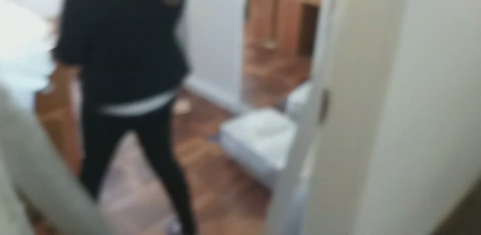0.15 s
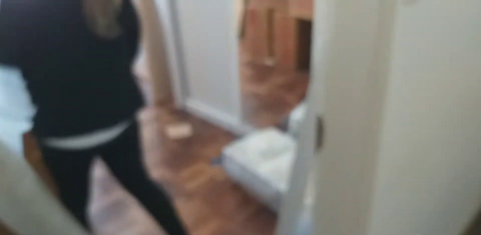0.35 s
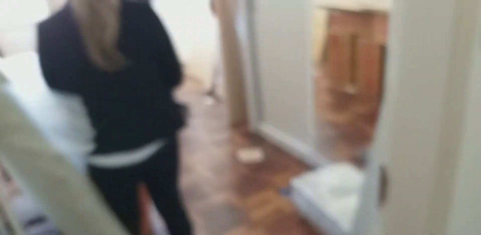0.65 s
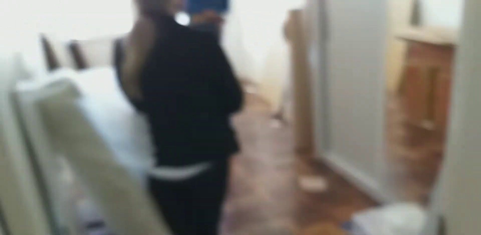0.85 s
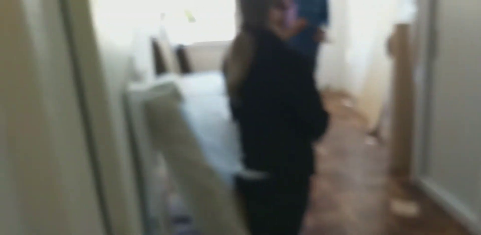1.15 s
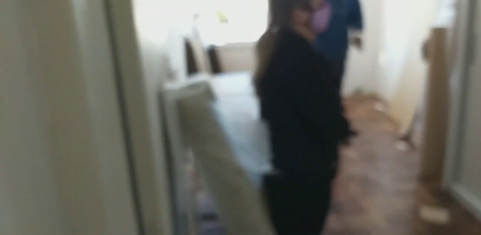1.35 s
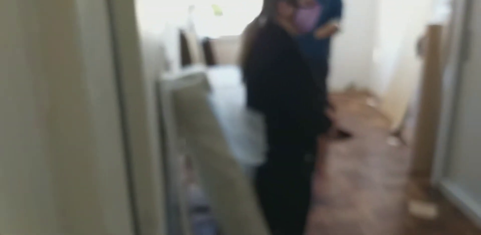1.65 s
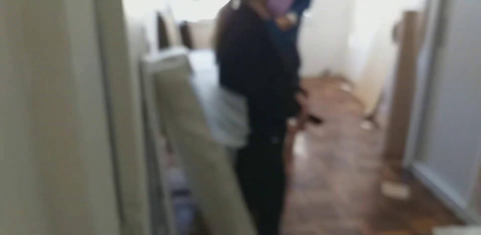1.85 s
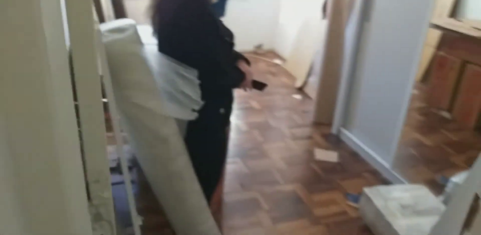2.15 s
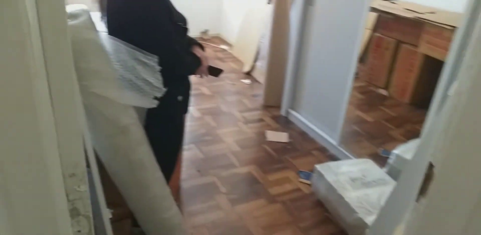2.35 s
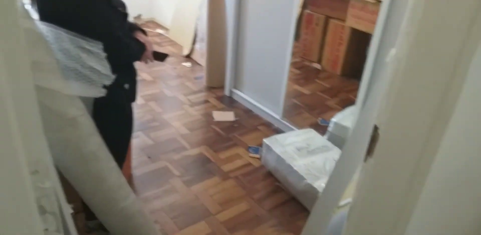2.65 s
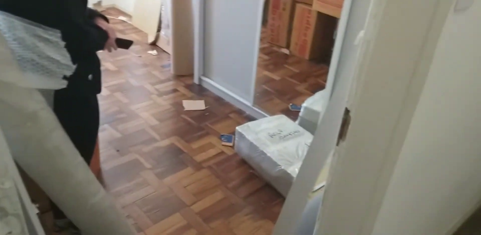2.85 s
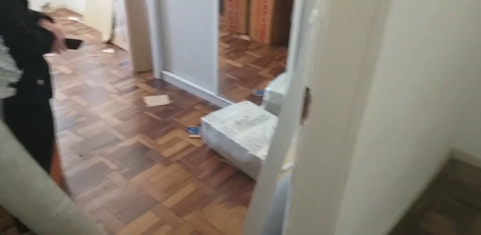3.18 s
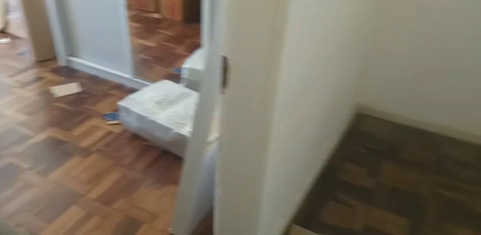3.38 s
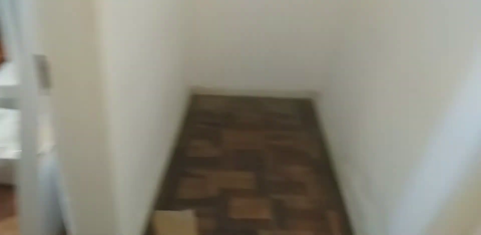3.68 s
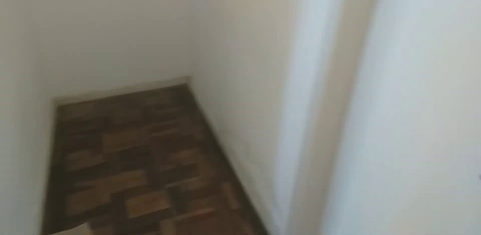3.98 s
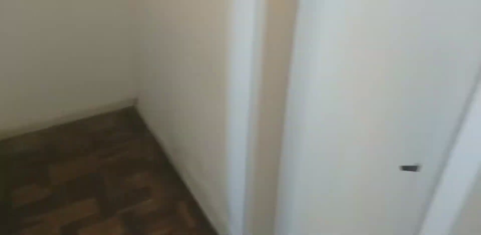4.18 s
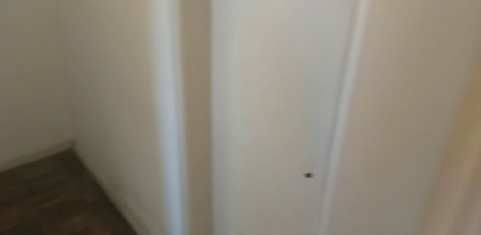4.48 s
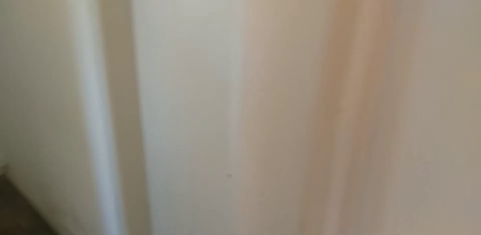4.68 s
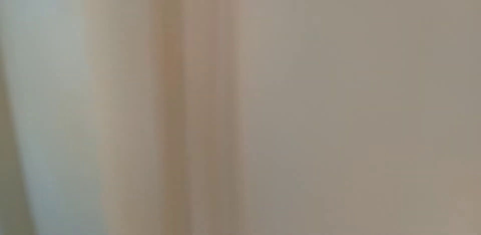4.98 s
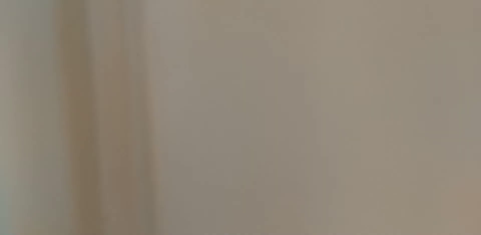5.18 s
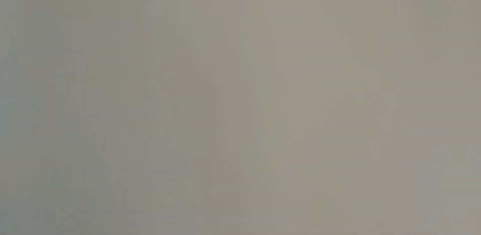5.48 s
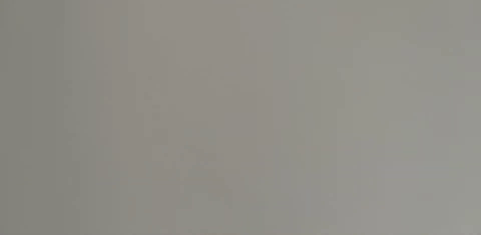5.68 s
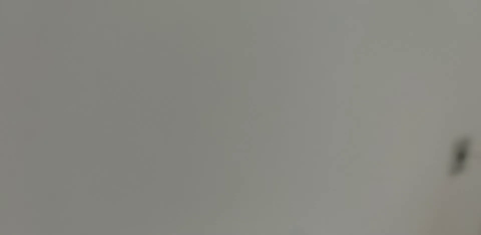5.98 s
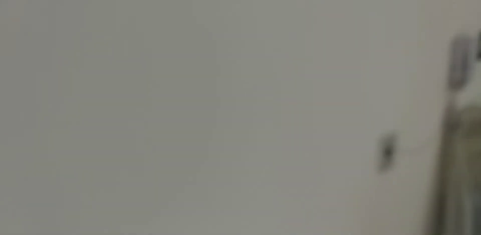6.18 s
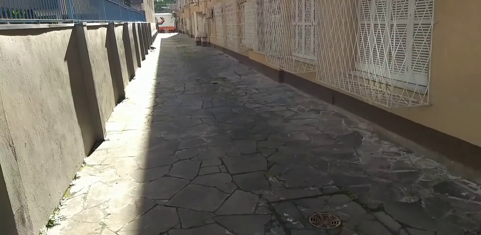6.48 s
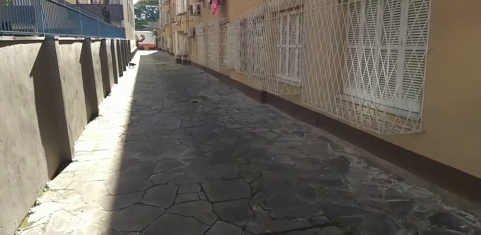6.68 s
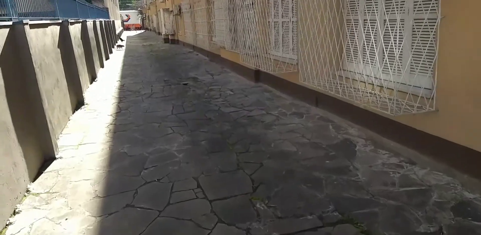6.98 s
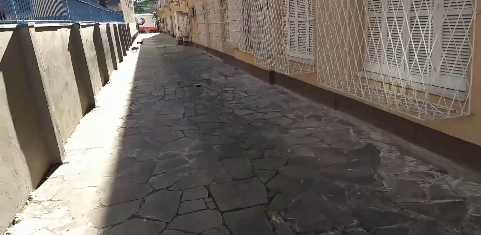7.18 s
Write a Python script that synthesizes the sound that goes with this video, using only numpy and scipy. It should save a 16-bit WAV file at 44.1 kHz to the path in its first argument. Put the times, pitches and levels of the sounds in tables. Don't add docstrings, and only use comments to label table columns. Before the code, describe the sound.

Soft soles scuff and step on a bare wooden floor in a ringing empty room, then an airy alley with insect chirps.

```python
import sys
import numpy as np
from scipy import signal
from scipy.fft import rfft, irfft, next_fast_len
from scipy.io import wavfile
from scipy.ndimage import uniform_filter1d, map_coordinates

SR = 44100
rng = np.random.default_rng(int(sys.argv[2]) if len(sys.argv) > 2 else 0)


def store_wav(level_fs):
    pcm = np.round(np.clip(np.atleast_2d(level_fs), -1, 1) * 32767)
    wavfile.write(sys.argv[1], SR, pcm.T.astype(np.int16))


def gain_from_decibels(decibels):
    exponent = np.asarray(decibels, float) / 20
    return 10 ** exponent


N = 323694

# (time [s], peak level [dB], wood above it [dB], grit above it [dB])
LANDINGS = [(0.2726, -31, -13, -1), (0.371, -31, -19, -9), (0.5803, -37, -25, -16), (0.7433, -9, -30, 7),
            (1.086, -14, -12.5, -3), (1.4534, -40, -38, -2), (1.6392, -25, -31, -4), (1.724, -40, -24, -18),
            (1.916, -18.5, -48, 5.5), (2.3513, -24, -1.5, -0.5), (2.732, -37, -28, 2),
            (2.7636, -23, -14, -14.5), (2.805, -19, -7, -14), (2.9873, -15.5, -14.5, -14),
            (3.296, -40.5, -11, 9), (4.5042, -66, -37, -22), (4.894, -43, -21, -12), (5.224, -13, -38, -32),
            (5.801, -30, -25, -17), (6.1544, -32, -35, -6), (6.252, -14.5, -21, -18)]
# (time [s], peak level [dB], pitch [Hz], life
KNOCKS = [ (.2686, -30, 4500, 1.5), (.5833, -29, 7000, 1), (.5916, -24, 7500, 1), (.7453, -8, 8900, 2.6),
          (.7483, -16, 4600, 1.5), (.7763, -15, 4800, 1.5), (.7806, -15, 4200, 1.5), (1.1016, -22, 8000, 1),
          (2.8068, -18.5, 5500, 1), (2.75, -53, 170, 1.5), (2.806, -43, 300, 2), (2.826, -43, 190, 2),
          (2.851, -43, 325, 4.5), (2.84, -46, 250, 4), (2.736, -56, 220, 2), (2.866, -46, 200, 2),
          (3.062, -50, 380, 3), (.848, -46, 430, 6), (.868, -59, 300, 4), (.89, -54, 440, 6),
          (4.905, -45, 1150, 4), (4.922, -44, 1100, 5), (2.9, -50, 190, 2), (2.996, -44, 280, 2),
          (3.017, -42, 300, .8), (3.028, -40, 170, .6), (3.039, -42, 220, .6), (3.039, -45, 88, 3),
          (3.053, -42, 190, .8), (3.1, -48, 210, 2), (4.9232, -32, 7800, 1.5), (5.2236, -33, 2600, 1.6),
          (5.2243, -33, 5000, 3), (5.2252, -35, 3700, 2), (5.2262, -32, 5000, 2.5),
          (5.2268, -35, 2500, 1.6), (5.5815, -36, 7000, 1), (5.7318, -21, 1500, .7),
          (5.7319, -31, 3600, .9), (5.7338, -40, 550, .7), (5.7418, -42, 1300, 1.5),
          (5.748, -41, 1700, 1.5), (5.738, -40, 1580, 2), (5.7451, -40, 1370, 1.5), (5.7502, -32, 1300, .8),
          (5.7503, -41, 4800, 1.5), (5.7535, -42, 1500, 1.5), (5.8518, -25, 5500, 1),
          (5.85235, -19, 11500, .9), (5.85315, -16, 3000, .85), (5.85315, -22, 6200, 1.6),
          (5.85315, -18.5, 11800, 1.5), (5.853, -26, 14500, 2)]
# (time [s], peak level [dB], pitch [Hz], life [cycles])
SAND = [(1.7302, -37, 8400, 2), (2.3556, -29, 13000, 2), (2.7327, -34, 8000, 1.5), (2.7372, -33, 9400, 2),
        (2.7818, -30, 9200, 2), (2.9905, -31, 8400, 1.5), (3.2958, -38, 11300, 1.5), (3.2997, -39, 8100, 2),
        (4.1693, -38, 7500, 2), (4.5057, -42, 7800, 3), (4.5065, -49, 5500, 6), (4.511, -51, 5700, 8),
        (4.5165, -49, 5600, 8), (4.523, -49, 5700, 5), (4.527, -48, 5700, 9), (4.5345, -49, 5500, 4),
        (4.55, -51, 5500, 4), (4.5548, -48, 5300, 4), (2.3532, -36, 3600, 3), (2.3618, -32, 9000, 2),
        (2.3873, -33, 4200, 3), (2.9888, -33, 4500, 2), (5.1928, -37, 11900, 2), (5.4075, -39, 11600, 2),
        (5.8017, -38, 7900, 3), (5.9309, -30, 7300, 1), (5.9412, -34, 8300, 1.2), (5.9497, -32, 9000, 1),
        (5.9915, -35, 11500, 1), (6.004, -34, 12000, .8), (6.025, -36, 5500, 1.5), (6.037, -36, 5500, 1.5),
        (6.1545, -39, 12500, 1), (6.1555, -37, 8400, 2), (6.1629, -38, 13700, 2), (6.1672, -36, 8600, 2),
        (6.1676, -41, 14000, 2), (6.2542, -36, 8100, 1.5), (6.2535, -36, 4500, 1.5),
        (6.3517, -41, 13400, 2)]
# (frequency [Hz], density [dB])
SOLE_SPECTRUM = [(240, -34), (400, -21), (432, -8.5), (527, -12), (684, -6.5), (1050, -9), (1640, -10.5),
                 (1800, -8), (2850, -8), (3500, -7.5), (4350, -6), (5300, -7.5), (6410, -9), (7830, 0.5),
                 (12400, 5.5), (15600, -11.5)]
# (frequency [Hz], density [dB])
BOARD_SPECTRUM = [(71, -36), (120, -6), (156, -2), (326, 0), (417, -1), (800, 1), (1760, -120)]
# (frequency [Hz], density [dB])
HUSH_SPECTRUM = [(18, -33), (30, -2), (85, 1.5), (144, -1.5), (422, -4), (1300, -8), (1520, -7),
                 (2310, -13), (3000, -12), (4220, 2), (6580, -3), (8330, 4), (12300, -4.5), (15600, -11.5)]
# (time [s], firing tone level [dB], load as its octave above it [dB])
ENGINE = [(0.0, -87, -18), (.8, -73, -13), (1.05, -63, -28), (1.5, -72, -6), (2.05, -64, -2),
          (2.35, -83, -1), (2.9, -86, 1), (3.1, -63, -9.5), (4.2, -61.5, -4.5), (4.5, -57, 0),
          (5.05, -57, -8.5), (5.2, -60, -24), (5.4, -58, -12), (5.75, -59, -20), (6.44, -56.5, -23)]
# (frequency [Hz], decay time t60 [s])
ROOM_T60 = [(300, 0.081), (1500, 1), (5000, 0.48), (12000, 0.28)]
# (frequency [Hz], width [Hz], level [dB])
ROOM_MODES = [(80, 20, -73), (145, 14, -73.5)]
# (frequency [Hz], density [dB])
TOWN_SPECTRUM = [(18, -46), (30, -14), (103, -1.5), (233, -4.5), (374, -10.5), (801, -11.5), (1810, -7.5),
                 (3310, -24), (4420, -20), (5310, -21.5), (5740, -22), (6210, -26), (10500, -23.5),
                 (14000, -26), (16000, -37)]
# (time [s], peak level [dB], pitch [Hz], life [cycles])
ALLEY_TICKS = [(6.4832, -51, 14300, 2), (6.4949, -44, 11000, 1), (6.538, -45, 14500, 3),
               (6.5403, -38, 14300, 3), (6.5435, -44, 14500, 3), (6.6035, -42, 13500, 3),
               (6.6214, -43, 7700, 2), (6.6261, -41, 12600, 3), (6.6293, -44, 7900, 2),
               (6.6674, -38, 12850, 3), (6.8244, -52, 14300, 30), (6.8215, -52, 13500, 2),
               (7.0856, -45, 10500, 1.5), (7.1088, -36, 8700, 1.5), (7.1086, -40, 13000, 1.5),
               (7.1093, -44, 5050, 14), (7.111, -48, 5850, 8), (7.1467, -37, 7700, 2),
               (7.1469, -39, 12500, 1.5)]
# (time [s], peak level [dB], pitch [Hz], life [cycles])
STONE_STEP = [(7.107, -36.5, 402, 6.4), (7.12, -41, 517, 4), (7.144, -46, 805, 4), (7.175, -41, 135.1, 4),
              (7.31, -46, 450, 8), (6.857, -41, 95, 2), (6.91, -46.5, 800, 27)]
# (time [s], level [dB], run-up [s], hold [s])
SWISHES = [
    (6.48, -70, 0.022, .03),
    (6.542, -64, .015, 0.046),
    (6.64, -63, 0.096, .01),
    (7.109, -54, 0.046, .01),
    (7.175, -72, 0.066, 0.0092),
    (7.32, -71, .1, .02),
]
# (time [s], length [s], level [dB])
CHIRPS = [(6.492, .036, -66), (6.54, .035, -68), (6.59, 0.021, -71), (6.616, .028, -64), (6.655, .022, -65),
          (6.684, .022, -65), (6.725, .022, -72), (6.768, .054, -67), (6.83, 0.027, -61),
          (6.863, 0.026, -61), (6.912, .034, -66), (6.958, 0.069, -63), (7.045, .022, -69),
          (7.084, 0.033, -64), (7.135, .036, -68), (7.18, 0.039, -64), (7.245, .02, -69),
          (7.277, .018, -66), (7.3, .024, -64), (7.33, .03, -65.5)]
# (frequency [Hz], width [Hz], level [dB], phase [rad])
PORTS = [(1933, 440, -11.5, 0.56), (9620, 780, -11, 2.1)]
# (time [s], rasp level [dB], slide [s], grit above it [dB], dust above it [dB])
GRIPS = [(0.272, -43.5, 0.0074, -8.5, -9), (.588, -45, 0.015, 1.5, -9.5), (0.746, -25, 0.032, -2.5, -3.5),
         (1.101, -41.5, 0.01, -1, 2), (1.087, -50, .01, 9.5, 0), (.372, -52.5, .01, -2, -2),
         (1.278, -47, 0.025, -2.5, -1.5), (1.918, -51, 0.0063, 1, 10), (1.465, -47, 0.081, 0, -5),
         (2.353, -46, 0.061, 0, 0), (2.734, -50.5, 0.038, 3.5, 3.5), (2.993, -46, 0.045, -4, -3),
         (3.1, -58.5, 0.11, 3, -6), (4.508, -65, 0.0078, 5, 4), (5.23, -50, 0.011, -12, -3),
         (5.805, -53, .01, 3, -8), (5.822, -47, 0.016, 4, -7), (5.841, -52, 0.0081, 7.5, -5),
         (5.87, -52, .25, 2.5, -9), (6.155, -58, .015, -0.5, -4), (6.251, -50, 0.075, -5, -11),
         (6.254, -50, .008, -3, -12)]
# (time of full speed [s], rasp level [dB], run-up [s], slide [s], brightness [dB])
DRAGS = [(0.0, -50, .1, 0.12, -1.5), (0.449, -46.5, 0.096, 0.0033, -2), (.71, -54, 0.022, .03, 3.5),
         (1.22, -48.5, 0.16, 0.012, 2.5), (1.651, -55, 0.1, 0.039, -9), (1.96, -47.5, 0.4, .25, 4),
         (1.44, -54, 0.046, .01, 0), (2.3, -55, 0.046, 0.027, 3.5), (2.77, -42, 0.012, 0.008, 0.5),
         (2.808, -41.5, 0.01, 0.0069, 3), (3.37, -56.5, 0.15, 0.025, -0.5), (3.56, -53, 0.18, 0.095, 3),
         (3.78, -50.5, 0.15, 0.068, 2), (4.05, -72, 0.034, 0.039, 6.5), (4.17, -57.5, 0.084, 0.14, 5.5),
         (4.33, -56.5, 0.25, 0.025, 3.5), (4.66, -62.5, 0.14, 0.004, 5.5), (4.78, -52.5, 0.093, 0.018, 4.5),
         (4.915, -46, 0.07, 0.011, 1.5), (4.985, -54, .03, 0.027, -4.5), (5.2, -56, 0.11, .005, 4),
         (5.42, -58.5, 0.13, 0.02, 5), (5.505, -54.5, 0.11, .005, 2), (5.575, -54, 0.063, 0.12, 3.5),
         (5.77, -63, 0.14, 0.013, -17)]
# (time [s], level
# [dB], height above the joists [octaves], run-up [s], hold [s])
FLOOR_LOADS = [(0.83, -50, 1.16, 0.071, 0.027), (2.34, -56, -1, 0.07, 0.056), (2.815, -44, 0.4, 0.017, 0.029),
               (2.994, -46.5, 0.2, 0.015, 0.038), (3.008, -48, -0.9, 0.029, 0.13),
               (3.365, -60.5, 0.7, 0.08, 0.086), (3.516, -60, 1.2, 0.033, 0.065), (3.596, -67, 2, .05, .04),
               (0.03, -66, -0.8, .05, 0.29), (2.203, -69, 0, .06, .03), (2.764, -47.5, -0.5, 0.016, 0.075),
               (4.305, -61.5, 0.6, 0.072, 0.043), (5.236, -57, 1.4, 0.061, 0.05),
               (5.418, -56.5, 0.3, 0.055, 0.067), (5.44, -67, -1.6, .05, .08), (6.3, -59.5, .5, .08, 0.036),
               (3.55, -61.5, -.5, .2, .1), (.575, -63, 2, .012, .005), (5.391, -52.5, 1.43, 0.032, 0.06),
               (5.728, -57.5, 1, 0.013, 0.0049), (5.747, -48, 4, 0.036, .005), (6.3, -59.5, 2.2, 0.072, 0.014),
               (0.115, -56, 2.41, 0.12, 0.026), (0.458, -53.5, 2.28, 0.12, 0.0045),
        (0.593, -46, 2.37, 0.012, .005), (0.757, -31, 2.75, 0.013, 0.018),
        (1.104, -48, 2.24, 0.0066, 0.021), (1.19, -61, 1.6, .05, 0.034), (1.563, -53, 3.05, 0.05, 0.03),
        (2.063, -56, 2.5, 0.19, 0.36), (2.37, -50.5, 1.44, 0.12, 0.027), (2.804, -48.5, 1.95, 0.033, 0.025),
        (3.013, -51.5, 2.34, 0.046, 0.032), (3.793, -60, 2.35, 0.13, 0.015),
        (4.266, -60, 2.24, 0.08, 0.078), (4.37, -59, 1.7, 0.043, 0.025), (4.793, -63, 1.6, 0.037, .005),
        (4.904, -51.5, 2.24, 0.015, 0.024), (5.224, -49, 3.08, 0.015, 0.039),
        (5.839, -45, 2.5, 0.023, 0.011), (1.786, -58.5, 2.95, .1, 0.14), (1.29, -51.5, 3.37, .03, .06),
        (1.645, -56.5, 2.77, .015, 0.041), (.44, -55, 3.4, .05, 0.043), (2.356, -52, 3.6, .02, 0.066),
        (.9, -51, 3.6, .04, .04), (3.645, -56.5, 2.93, 0.26, 0.13), (5.007, -57, 2.87, 0.15, 0.022),
        (5.64, -65, 1.5, 0.2, 0.028), (6.266, -55, 3.45, .01, 0.22), (5.919, -53, 2.54, 0.034, .12)]

SILENCE_FROM_S, SILENCE_TO_S = 6.439, 6.478
HUSH_DB, JOIST_DB, RUMBLE_DB = -55, -79, -70.5
FIRING_HZ = 55
RUN_UP_DB, GRIP_S, CONTACT_S = 13.5, 0.0089, 0.0088
SLIDE_DB_S = 19.5
GRIP_FADE_DB_S, DRAG_FADE_DB_S, DUST_FADE_DB_S, WOOD_FADE_DB_S, SWISH_FADE_DB_S = 149, 122, 27, 136, 81
DUST_FOLLOWS, DUST_DB = 0.78, -2.5
SLAT_DB, SLAT_BRIGHT = -11.5, 0.29
WOOD_UP_DB_OCT, WOOD_DOWN_DB_OCT = 14, 16
WALLS_DB, WALLS_STRETCH = -14, .2
OFF_CENTRE_DB = -14
TOP_HZ = 15830


def unit(x):
    return x / np.sqrt(np.mean(x ** 2) + 1e-20)


def along(points, hz):
    f, v = np.transpose(points)
    return np.interp(np.log(hz + 1), np.log(f + 1), v)


def curves(rows):
    s, *cols = np.transpose(rows)
    return [np.interp(np.arange(N) / SR, s, c) for c in cols]


def wobble(rate):
    knots = rng.standard_normal(int(N * rate / SR) + 4)
    return map_coordinates(knots, [np.arange(N) * rate / SR])


def filtered(x, response):
    m = next_fast_len(len(x) + 8192)
    return irfft(rfft(x, m) * response(np.fft.rfftfreq(m, 1 / SR)), m)[:len(x)]


def band(x, spectrum, lo_hz, hi_hz):
    def response(hz):
        low_edge = 1 + (lo_hz / (hz + 1)) ** 16
        high_edge = 1 + (hz / hi_hz) ** 16
        return gain_from_decibels(along(spectrum, hz)) / np.sqrt(low_edge * high_edge)
    return unit(filtered(x, response))


def narrow(hz, width_hz, db):
    noise = rng.standard_normal(N)
    return gain_from_decibels(db) * unit(filtered(noise, lambda f: np.exp(-((f - hz) / width_hz) ** 2)))


def patchy(depth_db, grain_db):
    z = signal.stft(rng.standard_normal(N + 512), nperseg=512)[2]
    field = rng.standard_normal(z.shape)
    field = uniform_filter1d(uniform_filter1d(field, 8, 0), 8, 1)
    x = signal.istft(z * gain_from_decibels(depth_db * unit(field)), nperseg=512)[1][:N]
    return x * gain_from_decibels(grain_db * wobble(500))


def tail(stretch):
    hz, t, z = signal.stft(rng.standard_normal(SR // 2), SR, nperseg=256)
    loss_db = 60 * t / (stretch * along(ROOM_T60, hz)[:, None])
    x = signal.istft(z * gain_from_decibels(-loss_db), SR, nperseg=256)[1]
    return x / np.linalg.norm(x)


def pings(rows, gain_db):
    out = np.zeros(N + SR)
    t = np.arange(-SR // 100, SR // 20) / SR
    for s, db, hz, cycles in rows:
        rise = np.where(t < 0, 2, 1)
        life = np.exp(-(t * hz / max(cycles, .3)) ** 2 * rise)
        swing = np.cos(2 * np.pi * hz * t) * life
        balanced = swing - life * swing.sum() / life.sum()
        out[round(s * SR) - SR // 100:][:len(t)] += gain_from_decibels(db + gain_db) * balanced
    return out[:N]


def strokes(s, db, run_up, hold, fade_db_s):
    clock = np.arange(0, N / SR + .002, .002)
    t = clock - s[:, None]
    hold = np.abs(hold)[:, None]
    loss = RUN_UP_DB * np.maximum(-t, 0) / np.maximum(run_up, .003)[:, None]
    loss = loss + SLIDE_DB_S * np.clip(t, 0, hold)
    loss = loss + fade_db_s * np.maximum(t - hold, 0)
    power = (gain_from_decibels(db[:, None] - loss) ** 2).sum(axis=0)
    return np.interp(np.arange(N) / SR, clock, np.sqrt(power))


def load(octave):
    s, db, centre, run_up, hold = np.transpose(FLOOR_LOADS)
    slope = np.where(octave > centre, WOOD_UP_DB_OCT, WOOD_DOWN_DB_OCT)
    return strokes(s, db - slope * np.abs(octave - centre), run_up, hold, WOOD_FADE_DB_S)


def hush():
    return gain_from_decibels(HUSH_DB - 2.0) * band(rng.standard_normal(N), HUSH_SPECTRUM, 39, 17000)


def drone():
    return sum(narrow(*mode) * gain_from_decibels(2.1 * wobble(3.58)) for mode in ROOM_MODES)


def engine():
    first_db, effort_db = curves(ENGINE)
    rumble = np.hypot(gain_from_decibels(RUMBLE_DB + 4.1 * wobble(5.2)), load(-0.89))
    turn = 2 * np.pi * np.cumsum(FIRING_HZ * (1 + 0.0258 * wobble(15))) / SR
    firing = gain_from_decibels(first_db - 5.0 + 1.5 * wobble(7.4)) * np.sin(turn)
    octave = gain_from_decibels(first_db + effort_db + 0.86 * wobble(3.6)) * np.sin(2 * turn)
    return firing + octave + gain_from_decibels(-4.0) * rumble * band(rng.standard_normal(N), HUSH_SPECTRUM, 76, 184)


def insect():
    hz, wander, wander_hz, edge_s, between_db = 5570, .0015, 40, .005, -74
    s, length, db = np.transpose(CHIRPS)
    clock = np.arange(SILENCE_TO_S, N / SR, edge_s / 2)
    t = clock - s[:, None]
    chirp = np.tanh(t / edge_s) - np.tanh((t - length[:, None]) / edge_s)
    gate = (gain_from_decibels(db[:, None]) * chirp).sum(axis=0) + gain_from_decibels(between_db)
    turn = 2 * np.pi * np.cumsum(hz * (1 + wander * wobble(wander_hz))) / SR
    return np.interp(np.arange(N) / SR, clock, gate) * gain_from_decibels(wobble(27)) * np.sin(turn)


def alley():
    cloth = strokes(*np.transpose(SWISHES), SWISH_FADE_DB_S)
    rumble = np.hypot(gain_from_decibels(-56.5), gain_from_decibels(2.5) * cloth)
    town = np.hypot(gain_from_decibels(-53.5), gain_from_decibels(1) * cloth)
    hiss = np.hypot(gain_from_decibels(-59), gain_from_decibels(-0.5) * cloth)
    air = patchy(depth_db=1.3, grain_db=1.2)
    far = rumble * band(air, TOWN_SPECTRUM, 51, 790)
    far += town * band(air, TOWN_SPECTRUM, 700, 4040)
    far += hiss * band(air, TOWN_SPECTRUM, 3380, 9060)
    far += narrow(15100, 600, -78)
    near = cloth * band(patchy(depth_db=1.2, grain_db=2), TOWN_SPECTRUM, 9000, 16000)
    return far + near + insect() + pings(ALLEY_TICKS, gain_db=0) + pings(STONE_STEP, gain_db=-9)


def knocks():
    x = pings(KNOCKS + SAND, gain_db=0)
    return x + gain_from_decibels(-14.5) * signal.fftconvolve(x, tail(0.086))[:N]


def squeak():
    start, end = 5.8057, 5.8358
    first_hz, last_hz, first_db, last_db = 700, 930, -34, -28
    share = np.linspace(0, 1, 400)
    slips = np.cumsum(first_hz + (last_hz - first_hz) * share) * (end - start) / len(share)
    at = np.interp(np.arange(int(slips[-1])), slips, share)
    rows = []
    for u in at:
        a, b = rng.standard_normal(2)
        db = first_db + u * (last_db - first_db) + 1.5 * a
        rows.append((start + u * (end - start), db, 7920 * (1 + 0.02 * b), 2.2))
    return pings(rows, gain_db=0)


def steps():
    out = np.zeros(N + 2 * SR)
    t = np.arange(SR // 4) / SR
    for s, db, wood_db, grit_db in LANDINGS:
        grain_gain = np.repeat(rng.standard_normal(len(t) // 25), 25)
        grains = rng.standard_normal(len(t)) * gain_from_decibels(7 * grain_gain)
        colour = band(grains, SOLE_SPECTRUM, 1660, 6540)
        colour += gain_from_decibels(grit_db + 11.5) * band(grains, SOLE_SPECTRUM, 7100, 17000)
        colour += gain_from_decibels(wood_db + 4.5) * band(grains, SOLE_SPECTRUM, 500, 3100)
        burst = gain_from_decibels(db - 31.0) * colour * (1 - np.exp(-t / 0.0009)) * np.exp(-t / CONTACT_S)
        wet = gain_from_decibels(4.5) * signal.fftconvolve(burst, tail(1.0))
        start = round((s - .003) * SR)
        out[start:][:len(t)] += burst
        out[start + 130:][:len(wet)] += wet
    return out[:N]


def scuffs():
    strokes_made = [(s, db, GRIP_S, slide, grit, dust, GRIP_FADE_DB_S) for s, db, slide, grit, dust in GRIPS]
    for *row, bright in DRAGS:
        strokes_made.append((*row, bright, DUST_DB + DUST_FOLLOWS * bright, DRAG_FADE_DB_S))
    s, db, run_up, slide, grit_db, dust_db, fade = np.transpose(strokes_made)
    fade = fade[:, None]
    rasp = strokes(s, db, run_up, slide, fade)
    grit = strokes(s, db + grit_db, run_up, slide, fade)
    dust = strokes(s, db + dust_db, run_up, slide, fade + DUST_FADE_DB_S)
    rubbed = strokes(s, db + SLAT_DB + SLAT_BRIGHT * grit_db, run_up, slide, fade)

    joist = np.hypot(load(0), gain_from_decibels(JOIST_DB))
    plank, board, block = load(0.63), load(1.09), load(1.946)
    slat = np.hypot(load(2.62), gain_from_decibels(-5.0) * rubbed)
    lath = np.hypot(gain_from_decibels(-2.0) * load(3.22), gain_from_decibels(-4.0) * slat)

    rub = patchy(depth_db=1.5, grain_db=0.5) * gain_from_decibels(0.88 * wobble(22.04))
    high = rasp * band(rub, SOLE_SPECTRUM, 3390, 5640)
    high += grit * band(rub, SOLE_SPECTRUM, 5410, 8830)
    high += dust * band(rub, SOLE_SPECTRUM, 11700, 22000)

    wood = patchy(depth_db=1.4, grain_db=1.1)
    low = joist * band(wood, BOARD_SPECTRUM, 147, 328)
    low += gain_from_decibels(-5.5) * plank * band(wood, BOARD_SPECTRUM, 326, 560)
    low += gain_from_decibels(-3.0) * board * band(wood, SOLE_SPECTRUM, 490, 786)
    low += block * band(wood, SOLE_SPECTRUM, 845, 1420)
    low += slat * band(wood, SOLE_SPECTRUM, 1510, 2460)
    low += lath * band(wood, SOLE_SPECTRUM, 2930, 3380)
    return high + low


def case_difference(hz):
    return sum(gain_from_decibels(db) * np.exp(1j * phase - np.abs((hz - centre) / width) ** 1.74)
               for centre, width, db, phase in PORTS)


def scene():
    t = np.arange(N) / SR
    rub = scuffs()
    walls = gain_from_decibels(WALLS_DB) * signal.fftconvolve(rub, tail(WALLS_STRETCH))[:N]
    flat = hush() + drone() + engine() + knocks() + squeak() + steps() + rub + walls
    leaving = np.clip((SILENCE_FROM_S - t) / 0.00068, 0, 1)
    arriving = np.clip((t - SILENCE_TO_S) / 0.002 + 1, 0, 1) ** 2
    mid = flat * leaving + alley() * arriving
    side = filtered(mid, case_difference) + pings(KNOCKS[-6:], OFF_CENTRE_DB)
    return np.array([mid + side, mid - side])


def low_pass(x):
    return signal.sosfilt(signal.butter(12, 16420, fs=SR, output="sos"), x)


def record(dry):
    def response(hz):
        lift_db = np.clip((hz - 13500) / 500, 0, 4)
        return gain_from_decibels(lift_db) * (hz < TOP_HZ)
    mix = np.array([filtered(port, response) for port in dry])
    return low_pass(mix)


dry = scene()
out = record(dry)
store_wav(out)
```